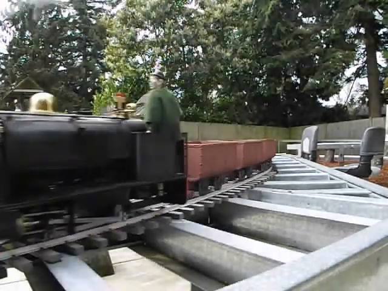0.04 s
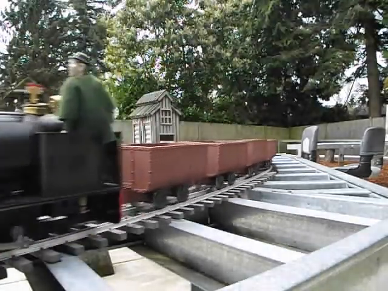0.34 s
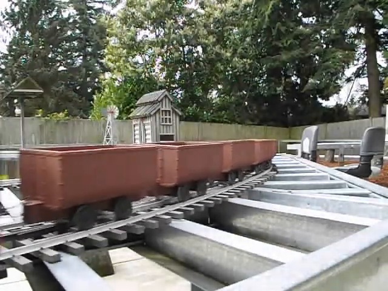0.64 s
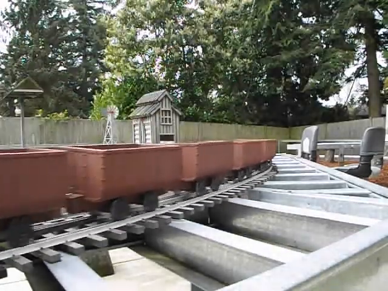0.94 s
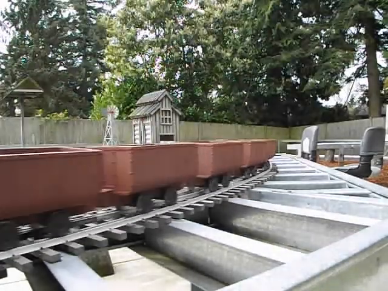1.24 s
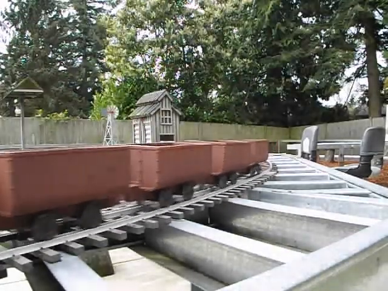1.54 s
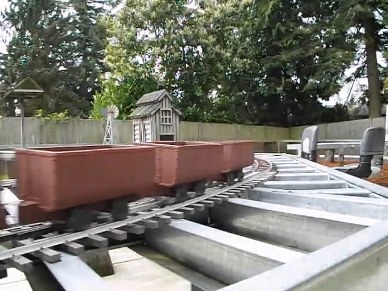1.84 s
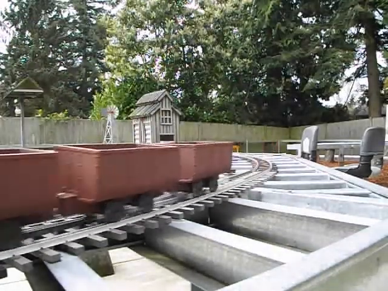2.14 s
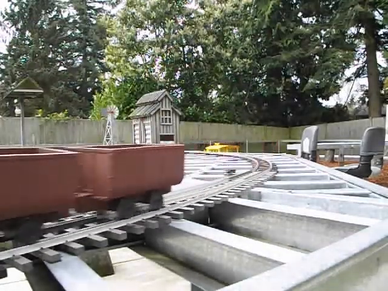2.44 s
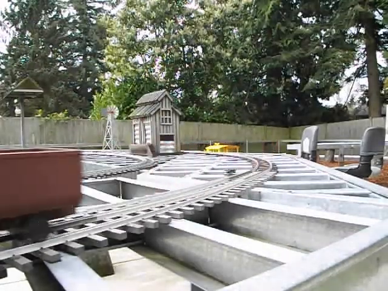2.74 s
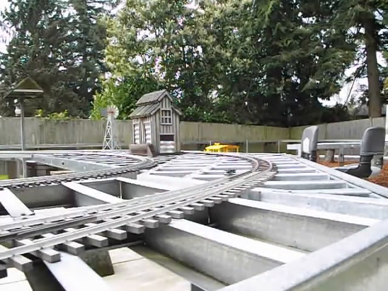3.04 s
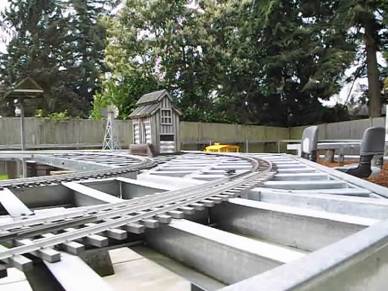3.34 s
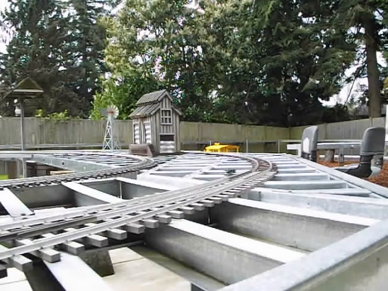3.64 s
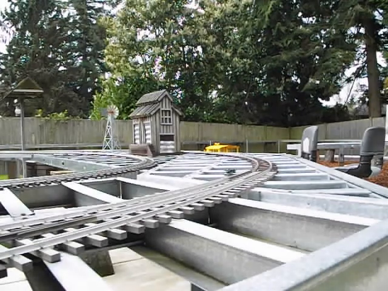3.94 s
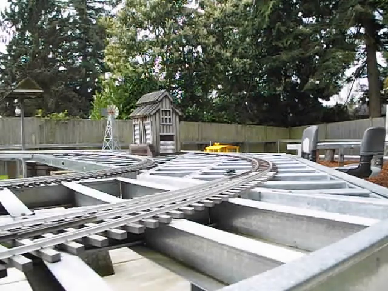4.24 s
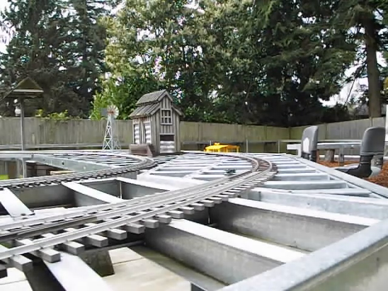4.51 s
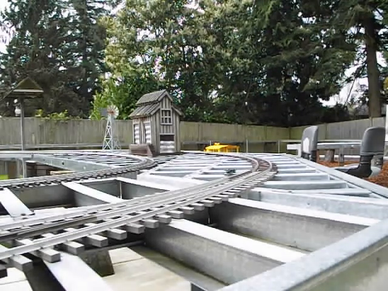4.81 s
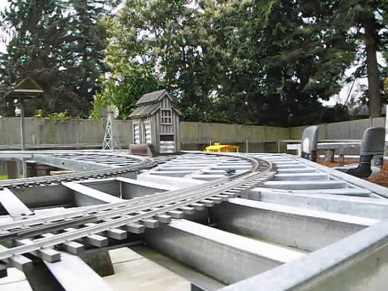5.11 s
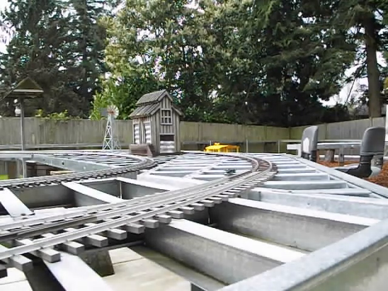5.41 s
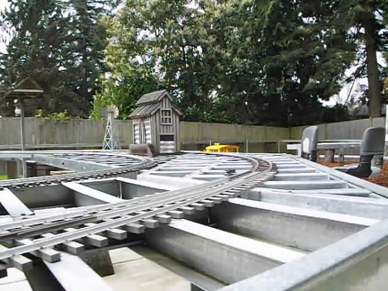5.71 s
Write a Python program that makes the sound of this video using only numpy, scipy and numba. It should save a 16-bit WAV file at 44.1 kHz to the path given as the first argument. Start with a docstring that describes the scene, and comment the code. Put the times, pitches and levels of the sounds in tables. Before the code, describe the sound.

Outdoors, right beside a miniature railway track, a little engine goes by with rapid, spitting puffs of steam. Bright metallic clacks come thick and fast as the wagons roll past over a gritty rumble. The wheels rub briefly in the curve, and the engine recedes to a quieter, faster flutter of hiss with only occasional clicks. Faint wind touches the microphone, with a low gust and a dull knock just before the end.

```python
"""A small steam train passes

A garden steam engine goes close by, its quick, wet puffs of steam making the chimney ring.
Its wagons rumble on the deck under the track, clack over rail joints and run off round a curve.
A breeze brushes the microphone, and there is one soft knock near the end.
The highest treble is cut away, loud bursts are turned down and the tallest clacks are flattened."""
import sys
import numpy as np
from scipy import signal
from scipy.fft import rfft, irfft, next_fast_len
from scipy.io import wavfile
from scipy.ndimage import uniform_filter1d
from numba import njit

SR = 44100
rng = np.random.default_rng(int(sys.argv[2]) if len(sys.argv) > 2 else 0)


def inscribe(sig):
    """Save sig as 16-bit PCM at rate SR to the path in sys.argv[1].

    A 1-D sig is mono; a 2-D sig holds one channel per row.
    Samples are clipped to [-1, 1] before scaling.
    """
    pcm = np.round(np.clip(np.atleast_2d(sig).T, -1, 1) * 32767)
    wavfile.write(sys.argv[1], SR, pcm.astype(np.int16))


N = 258789
T = np.arange(N) / SR

# The tone of rushing steam. Each row: frequency in Hz, relative level in dB.
STEAM_SPECTRUM = [(60, -41), (200, -15.5), (480, -31.5), (700, -34), (880, -17), (1100, -37), (1400, -16.5),
                  (1800, -9), (2300, -11), (2750, -3.5), (3200, -6), (3600, -11), (4200, -23.5),
                  (5200, -36.5)]


def undb(db):
    """Turn decibels into a number to multiply by."""
    return 10 ** (np.asarray(db) / 20)


def unit(x):
    """Scale a sound to an average power of 1."""
    return x / np.sqrt(np.mean(x ** 2))


def curves(table):
    """Join a table's rows with straight lines over time: one curve for each column after the first."""
    times, *columns = np.transpose(table)
    return [np.interp(T, times, column) for column in columns]


def noise():
    """White noise: an even hiss."""
    return rng.standard_normal(N)


def wander(rate):
    """A random drift, about 1 in size, that heads for a new value `rate` times a second."""
    step = int(SR / rate)
    held = np.repeat(rng.standard_normal(N)[:N // step + 1], step)
    return unit(uniform_filter1d(held, step)[:N])


def colour(x, spectrum):
    """Shape a sound's tone by rows of frequency in Hz and level in dB; white noise keeps its power."""
    hz, db = np.transpose(spectrum)
    size = next_fast_len(len(x), real=True)
    freqs = np.maximum(np.arange(size // 2 + 1) * SR / size, 1)
    gain = undb(np.interp(np.log(freqs), np.log(hz), db))
    return irfft(rfft(x, size) * unit(gain), size)[:len(x)]


@njit
def moving_bandpass(x, hz, width):
    """Keep only the sound near a frequency that can change at every sample."""
    out, band_state, low_state = np.empty(len(x)), 0., 0.
    for i in range(len(x)):
        tuning, damping = np.tan(np.pi * hz[i] / SR), width / hz[i]
        band = (band_state + tuning * (x[i] - low_state)) / (1 + tuning * (tuning + damping))
        band_state = 2 * band - band_state
        low_state += 2 * tuning * band
        out[i] = damping * band
    return out


def resonate(x, hz, *widths_hz):
    """Make a sound ring near one pitch, filtering once per width; a second pass cuts more around it."""
    for width in widths_hz:
        x = moving_bandpass(x, hz * np.ones(N), float(width))
    return x


def gritty(rate, spread_db, grit_db):
    """Noise sprinkled with tiny ticks of unequal size, about `rate` of them a second."""
    sizes = undb(spread_db * np.minimum(rng.exponential(size=N), 4))
    ticks = (rng.random(N) < rate / SR) * sizes * np.sign(noise())
    return unit(noise() + undb(grit_db) * unit(ticks))


def struck(age, modes):
    """The fading tones of an object, `age` seconds after it is hit."""
    return sum(undb(db) * np.exp(-np.log(1000) * age / fade_s) * np.sin(2 * np.pi * hz * age)
               for hz, fade_s, db in modes)


def breeze():
    """Moving air rumbles on the microphone, with one deeper gust."""
    # The strength of the wind and of the gust. Each row: time in seconds, relative level in dB.
    wind_levels = [(0, -51), (.7, -53), (1.5, -49.5), (2.8, -50.5), (3.1, -45.5), (4.2, -46.5),
                   (5.87, -44.5)]
    gust_levels = [(5.24, -62), (5.32, -33), (5.41, -31.5), (5.48, -37), (5.62, -53)]
    # The tone of each. Each row: frequency in Hz, relative level in dB.
    wind_spectrum = [(15, -4), (40, -6), (55, -2), (70, -3), (105, -4), (125, -2), (160, -8), (330, -13),
                     (700, -40)]
    gust_spectrum = [(12, -8), (30, -1), (60, 0), (100, -9), (160, -24), (400, -60)]
    (wind_db,), (gust_db,) = curves(wind_levels), curves(gust_levels)
    gust = colour(noise(), gust_spectrum) * undb(gust_db)
    return colour(noise(), wind_spectrum) * undb(wind_db + 2.5) + gust


def knock(start_s=5.789, level_db=-21, rise_s=.00077):
    """A soft, dull knock that dies at once."""
    # Its tones. Each row: pitch in Hz, seconds to fade by 60 dB, relative level in dB.
    tones = [(245, .05, 0), (295, .11, -5), (400, .05, -5), (520, .04, -8)]
    age = np.maximum(T - start_s, 0)
    return undb(level_db) * struck(age, tones) * np.minimum(age / rise_s, 1)


def wheel_rubs():
    """The wheels' rims rub in the curve and make the track sing in short, rough swells."""
    # Each row: middle in seconds, half length in seconds, pitch in Hz, width in Hz, level in dB.
    rubs = [(0.565, 0.053, 858, 59.7, -32), (0.809, 0.02, 880, 49.6, -33), (3.115, 0.039, 1036, 130, -25.5),
            (3.267, 0.035, 1020, 130, -22.5)]
    out = np.zeros(N)
    for middle, half, hz, width, db in rubs:
        tone = unit(resonate(noise(), hz, width, 4 * width))
        out += undb(db) * tone * np.exp(-((T - middle) / half) ** 2)
    return out


def wagons():
    """Wheels grind over gritty rail and set the deck droning; both swell as an axle goes by."""
    # The rolling. Each row: time in seconds, relative levels of the wheels and of the deck in dB.
    roll_levels = [(0, -34, -49.5), (.76, -37, -49), (1.3, -32, -41), (2.1, -32.5, -42), (2.45, -29.5, -36),
                   (2.68, -34.5, -38.5), (3.15, -27, -32.5), (3.75, -29, -34), (4.2, -32, -40),
                   (5.15, -34.5, -38), (5.87, -33, -44.5)]
    # Axles passing closest. Each row: time in seconds, boost to the wheel noise in dB.
    axles = [(1.86, 4), (1.998, 6), (2.219, 5), (2.54, 7)]
    # The tone of the grinding. Each row: frequency in Hz, relative level in dB.
    wheel_spectrum = [(80, -43), (200, -27), (380, -13), (500, -10), (700, -11), (1020, -7), (1400, -6.5),
                      (1800, -2), (2100, -1.5), (2450, -6), (3000, 1.5), (3300, -3.5), (4200, -19.5),
                      (5200, -34.5)]
    # The deck's own tones. Each row: pitch in Hz, width in Hz, relative level in dB.
    deck_tones = [(468, 26, 1), (584, 13, -2.5), (1022, 90, 0)]
    half_swell_s, deck_share = .058, .8
    wheel_db, deck_db = curves(roll_levels)
    swell_db = sum(db * np.exp(-((T - at) / half_swell_s) ** 2) for at, db in axles)
    grind = colour(gritty(rate=600, spread_db=5, grit_db=-12), wheel_spectrum)
    drone = unit(sum(undb(db) * unit(resonate(noise(), hz, width, 5 * width))
                     for hz, width, db in deck_tones))
    grind *= undb(wheel_db + swell_db + 8 + 1.5 * wander(55))
    drone *= undb(deck_db + deck_share * swell_db + 2.1 * wander(12))
    return grind + drone


def wheel_drop(crack_db, count=6, bounce_s=.008):
    """A wheel drops into a gap and bounces; each touch gives a crack and rings the wheel."""
    # The wheel's tones. Each row: pitch in Hz, seconds to fade by 60 dB, relative level in dB.
    wheel_tones = [(1302, 0.011, -9.5), (1540, 0.012, -9.5), (1930, 0.015, -7.5), (2350, 0.013, -3.5),
                   (2876, 0.042, 1), (3051, 0.071, 13.5), (3530, 0.014, 9), (3970, 0.049, -13),
                   (4530, 0.19, -19.5), (4770, 0.18, -29.5)]
    # The tone of the crack. Each row: frequency in Hz, relative level in dB.
    crack_spectrum = [(80, -54.5), (250, -35.5), (500, -18), (1200, -1), (2300, 4.5), (3300, 10),
                      (4000, -12.5), (5300, -37)]
    age = np.arange(SR // 10) / SR
    detune = rng.normal(1, .016)
    gaps, directions = rng.uniform(.3, 1, count), np.sign(rng.uniform(-.91, 1, count))
    ring = struck(age * detune, wheel_tones)
    crack = colour(rng.standard_normal(len(age)) * age * np.exp(-age / .00088), crack_spectrum)
    hit = unit(ring) + undb(crack_db + 5.5) * unit(crack)
    touches = np.zeros(len(age))
    touch_s = bounce_s * (np.cumsum(gaps) - gaps[0]) / gaps.sum()
    touches[(touch_s * SR).astype(int)] = directions * np.sqrt(1 - np.arange(count) / count)
    clack = signal.fftconvolve(hit, touches)[:len(age)]
    return clack / abs(clack).max()


def rail_joints(other_wheel_db=-5.5):
    """The two wheels of an axle hit a joint a moment apart, one harder than the other."""
    # Each row: time in seconds, relative peak in dB, relative strength of the crack in dB,
    # delay of the other wheel in seconds (negative if it hits first).
    axle_hits = [(.02, -14, -2, -0.0078), (0.088, -4, -4.5, -0.0091), (0.431, -5.5, -0.5, .01),
                 (.58, -14, 12.5, 0.00074), (1.031, -6, 2, .004), (1.09, -4.5, 3, -0.0044),
                 (1.342, -3, 1, .003), (1.484, -2.5, 4.5, -0.0059), (1.608, -1, -9, -0.0081),
                 (1.871, -1, 3, -0.0075), (1.989, -2, -6.5, 0.011), (2.103, -6, 16, .003),
                 (2.238, 0, -6.5, -0.0014), (2.347, -1.5, 0, .003), (2.569, -3.5, -5.5, 0.01),
                 (2.672, -3.5, 1, 0.0058), (2.889, -5, -2, -.012), (2.992, -2, 4, -0.0036),
                 (3.474, -10.5, 1, -0.0019), (3.961, -17, -1, .004), (5.286, -14, -2, 0.021)]
    out = np.zeros(N + SR)
    for time, db, crack_db, delay in axle_hits:
        for at, peak_db in (time, db), (time + delay, db + other_wheel_db):
            clack, start = wheel_drop(crack_db), max(int(at * SR), 0)
            out[start:start + len(clack)] += undb(peak_db) * clack
    # The clacks carry little bass.
    return signal.sosfilt(signal.butter(2, 450, "high", fs=SR, output="sos"), out[:N])


def puff_count():
    """How many puffs the engine has made so far, at each sample."""
    # The engine's speed. Each row: time in seconds, puffs per second.
    speeds = [(0, 13.85), (.8, 15.03), (1.0, 16.54), (1.85, 16.53), (3.7, 20.3), (4.2, 25), (5.8, 24)]
    (rate,) = curves(speeds)
    return np.cumsum(rate) / SR


def far_engine():
    """As the engine draws away, its puffs quicken and blur into a fluttering hiss with a wavering ring."""
    # The distant hiss. Each row: time in seconds, relative level in dB.
    levels = [(1.8, -34), (2.3, -28.5), (2.52, -24.5), (2.75, -41), (3.1, -22.5), (3.55, -26), (4.45, -30),
              (4.95, -22), (5.15, -28.5), (5.3, -22), (5.45, -28.5), (5.87, -21.5)]
    (db,) = curves(levels)
    phase = 2 * np.pi * puff_count()
    # The two cylinders are unequal, so every other puff is stronger.
    flutter_db = 3.4 * np.cos(phase) + 1.3 * np.cos(phase / 2) + 1.3 * wander(45) + 2.8 * wander(8)
    jet = colour(gritty(rate=380, spread_db=2, grit_db=2), STEAM_SPECTRUM)
    ring = unit(resonate(jet, 3090 * (1 + .016 * wander(16)), 110))
    hiss = unit(resonate(jet, 2560, 800))
    return unit(hiss + undb(-10.5) * ring) * unit(undb(flutter_db)) * undb(db - 4.5)


def deck_echo(x, delay_s, strength=.36):
    """Sound bounces off the deck; as the delay changes, the tone sweeps."""
    return x + strength * np.interp(T - delay_s, T, x)


def puff(start, rise_s=.018, hold_s=.0084, tail_s=.024):
    """The pressure of one puff: the valve opens, steam blows, the cylinder empties."""
    age = T - start
    return np.clip(age / rise_s + .5, 0, 1) * np.exp(-np.clip((age - hold_s) / tail_s, 0, 20))


def near_engine(first_puff_s=.0137):
    """Wet puffs ring the chimney over a leak of steam; the tone shifts as the engine moves past."""
    # The steam. Each row: time in seconds, then relative levels in dB of hiss, chimney and leak.
    levels = [(0, -15, -20.5, -27), (.34, -15, -18, -22), (.48, -15.5, -28.5, -27), (.6, -16, -20.5, -25.5),
              (.76, -17.5, -25.5, -31), (1.0, -23, -17.5, -18), (1.12, -21, -28.5, -28),
              (1.3, -15.5, -17.5, -25), (1.55, -21, -30, -26.5), (1.85, -19, -28, -38),
              (2.25, -27, -36.5, -42)]
    # The shifting tone. Each row: time in seconds, chimney and hiss pitches in Hz, echo delay in seconds.
    passing = [(0, 1810, 2770, 0.0017), (.12, 1763, 3050, 0.0021), (.5, 1780, 3046, 0.0023),
               (.95, 1968, 3105, .0021), (1.4, 2007, 2920, 0.0022), (1.65, 2030, 2866, 0.0019),
               (2.0, 2120, 3176, 0.0021)]
    # The four puffs of one wheel turn. Each row: delay in seconds, hiss and chimney boosts in dB.
    wheel_turn = [(0.0027, 2.5, 5), (.003, 0, 1.5), (-.004, 1, 2), (0.0024, -0.5, 2)]
    # The chimney's tones. Each row: multiple of its main pitch, width in Hz, relative level in dB.
    chimney_tones = [(1, 240, 0), (.8, 170, -1), (1.27, 450, -5)]
    hiss_db, chimney_db, leak_db = curves(levels)
    chimney_hz, hiss_hz, echo_s = curves(passing)
    hiss_puffs, chimney_puffs, count = np.zeros(N), np.zeros(N), puff_count()
    end_s = levels[-1][0]
    for k in range(int(np.interp(end_s, T, count))):
        delay, hiss_boost, chimney_boost = wheel_turn[k % len(wheel_turn)]
        pressure = puff(first_puff_s + np.interp(k, count, T) + delay)
        hiss_puffs += pressure * undb(hiss_boost)
        chimney_puffs += pressure * undb(chimney_boost)
    jet = colour(gritty(rate=600, spread_db=2, grit_db=-7), STEAM_SPECTRUM)
    ring = unit(resonate(jet, hiss_hz, 260, 1000))
    hiss = unit(deck_echo(ring + jet, echo_s))
    spit = colour(gritty(rate=300, spread_db=1, grit_db=-4), STEAM_SPECTRUM)
    chimney = sum(undb(db) * resonate(spit, multiple * chimney_hz, width, 2 * width)
                  for multiple, width, db in chimney_tones)
    chimney = unit(deck_echo(chimney, echo_s))
    # The leak keeps both sounding between puffs.
    hiss *= np.hypot(hiss_puffs * undb(hiss_db), undb(leak_db))
    chimney *= np.hypot(chimney_puffs * undb(chimney_db), undb(leak_db - 13))
    return hiss + chimney


def scene():
    """The train, the breeze and the knock, added into one channel."""
    train = near_engine() + far_engine() + wagons() + wheel_rubs() + rail_joints()
    return (train + breeze() + knock())[None]


def record(dry):
    """Cut the high treble, quickly turn down loud bursts and flatten the tallest peaks."""
    treble_hz, final_cut_hz, power_limit, ceiling = 5450, 15870, .23, .72
    narrow = signal.sosfilt(signal.ellip(10, .3, 90, treble_hz, fs=SR, output="sos"), dry)
    power = uniform_filter1d(uniform_filter1d(narrow ** 2, size=48), size=48)
    limited = narrow / (1 + (power / power_limit) ** 2) ** .25
    flattened = np.clip(limited, -ceiling, ceiling)
    return signal.sosfilt(signal.ellip(8, .2, 70, final_cut_hz, fs=SR, output="sos"), flattened)


dry = scene()
out = record(dry)
inscribe(out)
```